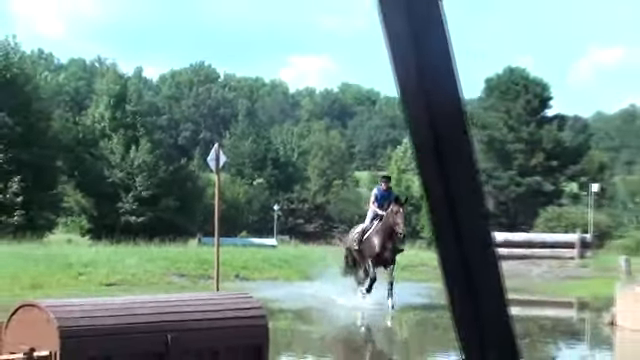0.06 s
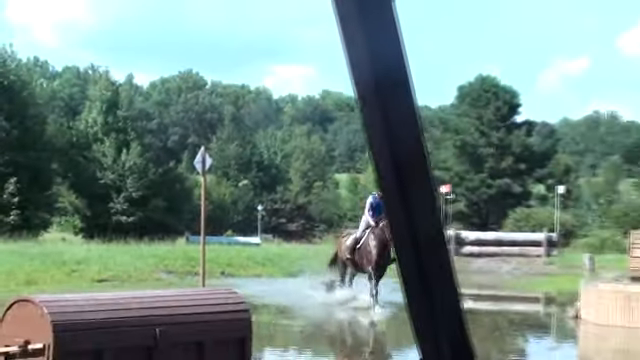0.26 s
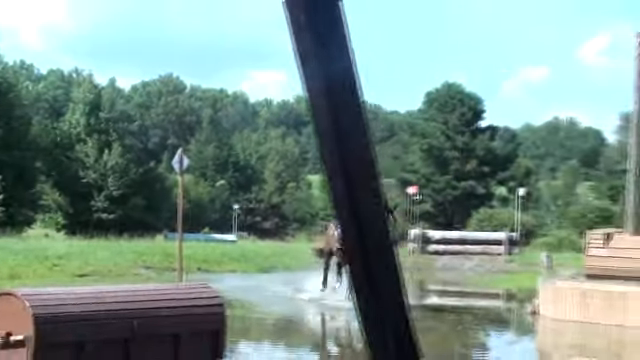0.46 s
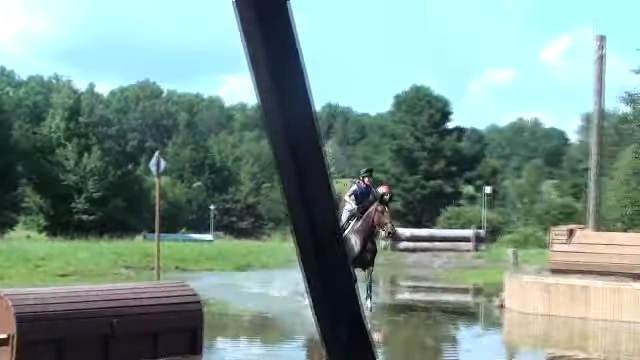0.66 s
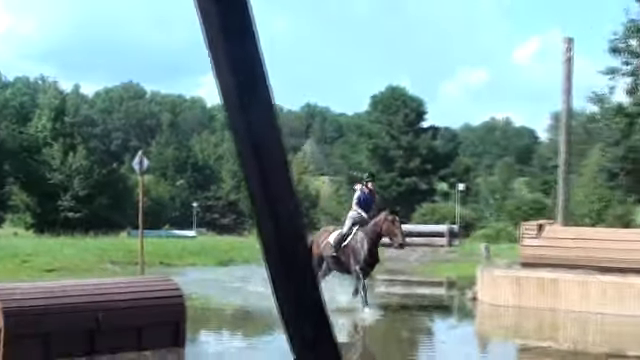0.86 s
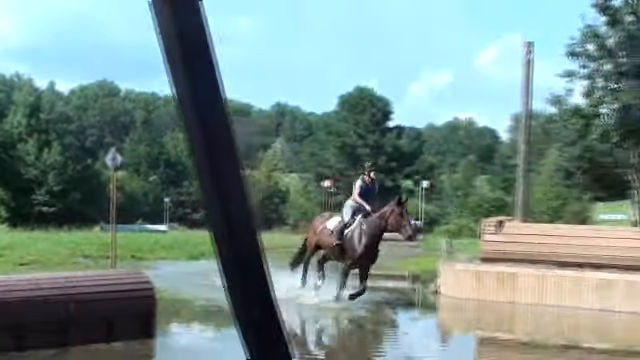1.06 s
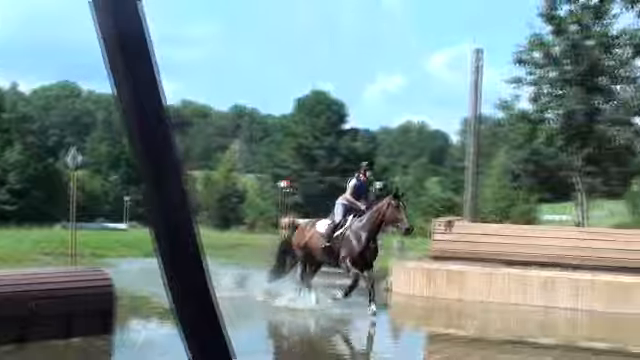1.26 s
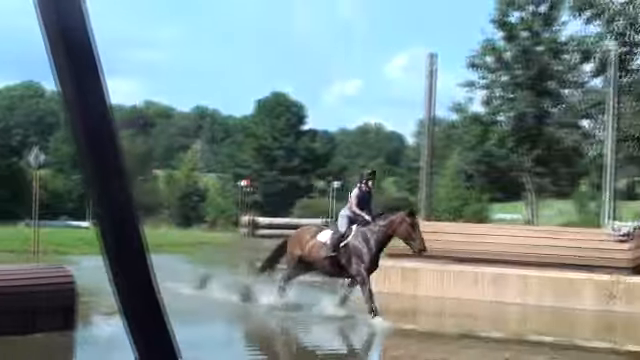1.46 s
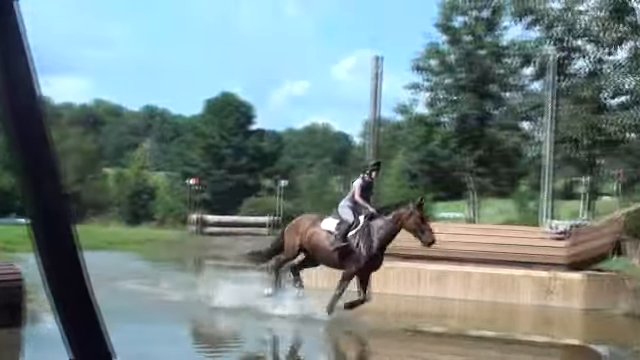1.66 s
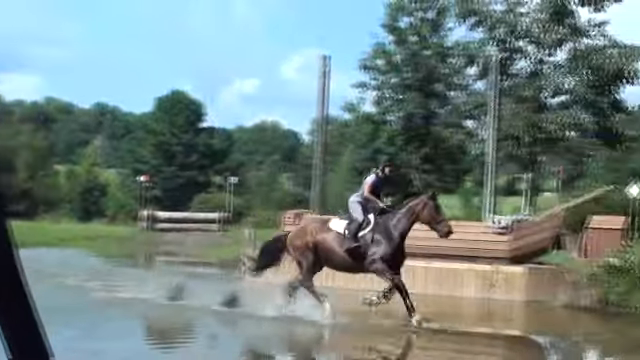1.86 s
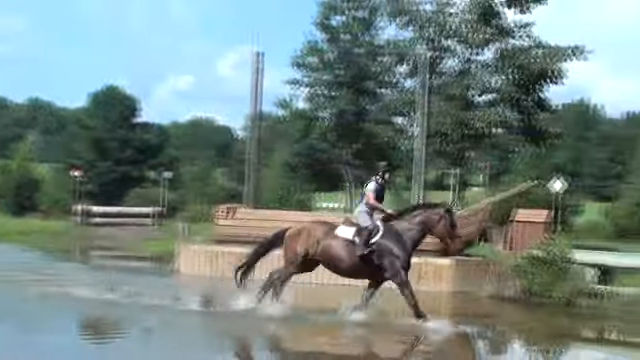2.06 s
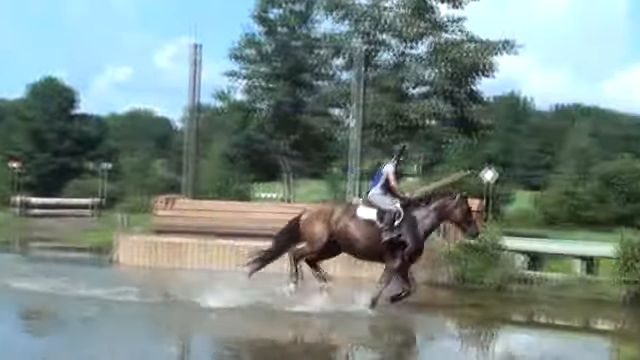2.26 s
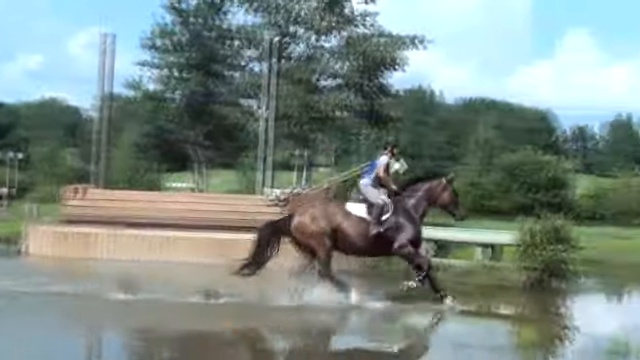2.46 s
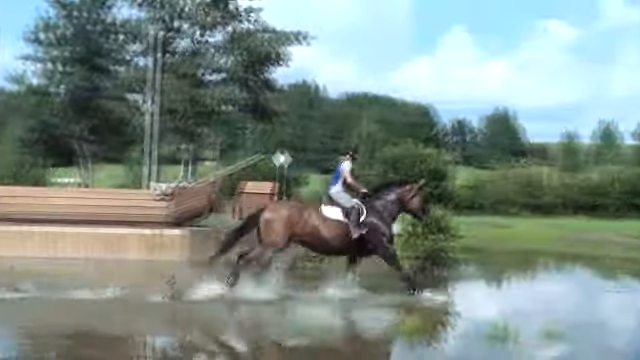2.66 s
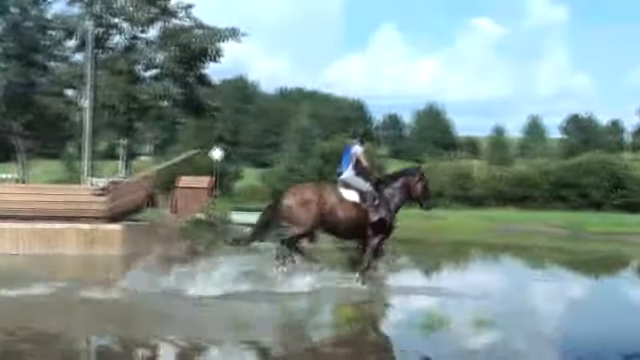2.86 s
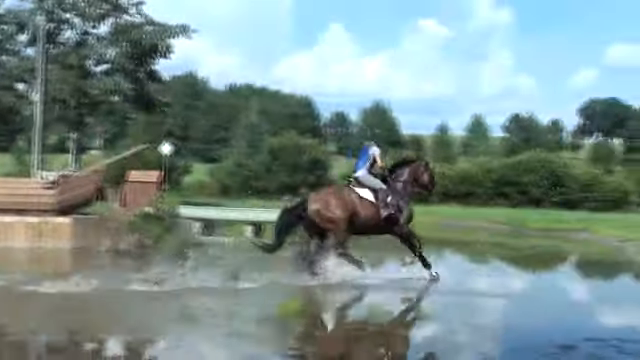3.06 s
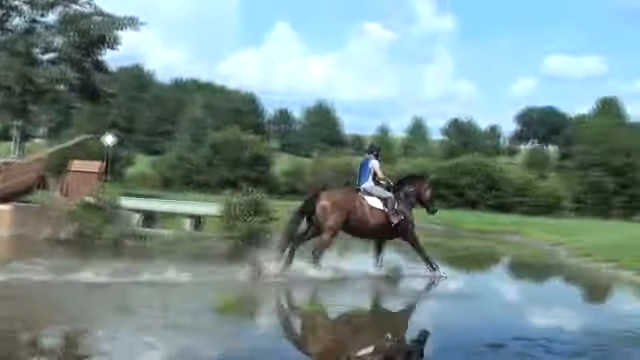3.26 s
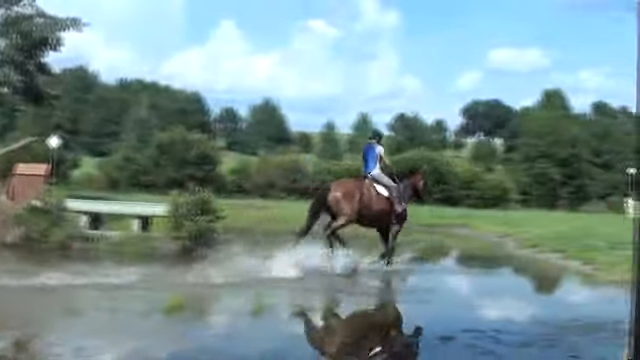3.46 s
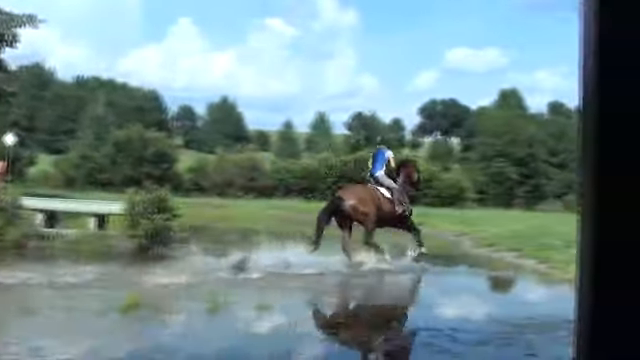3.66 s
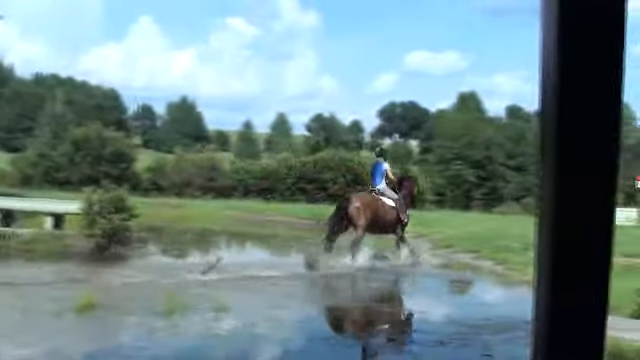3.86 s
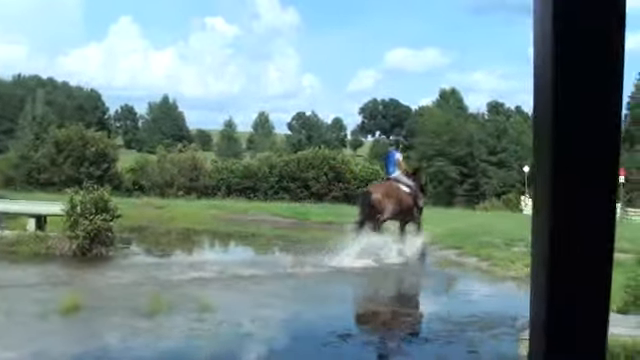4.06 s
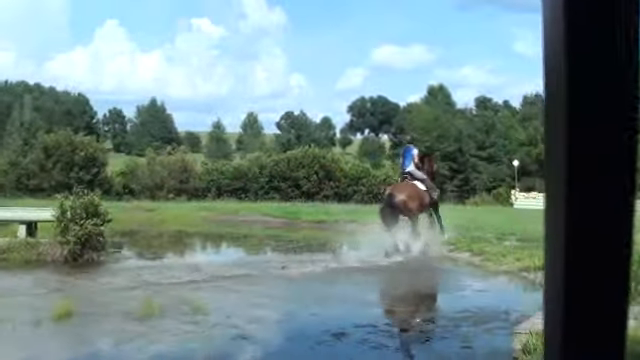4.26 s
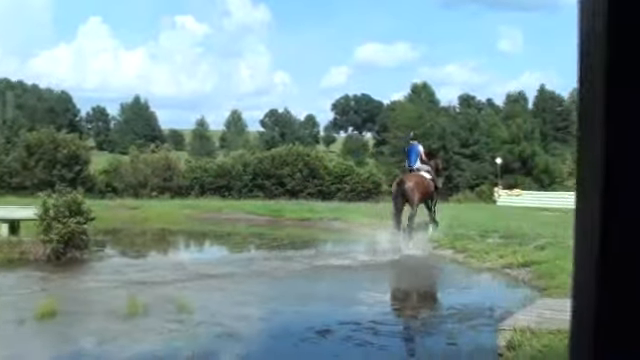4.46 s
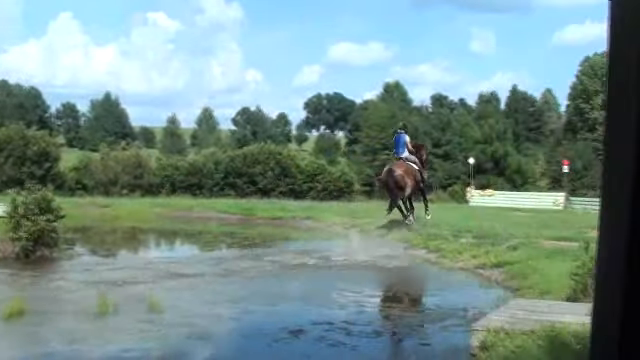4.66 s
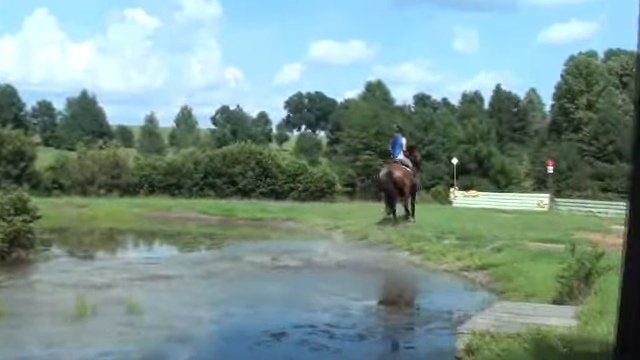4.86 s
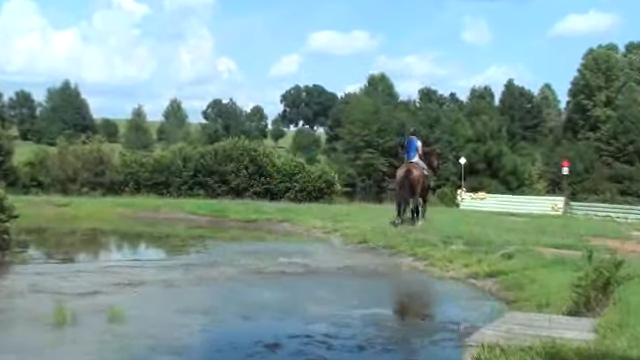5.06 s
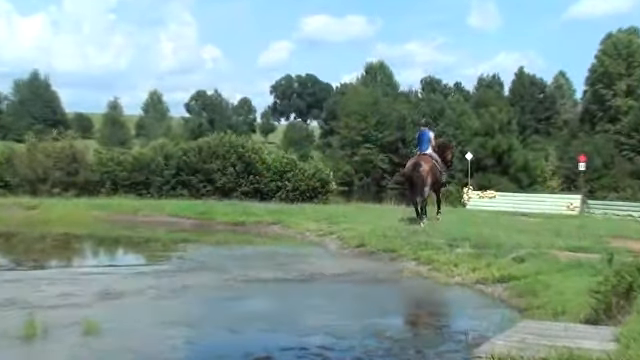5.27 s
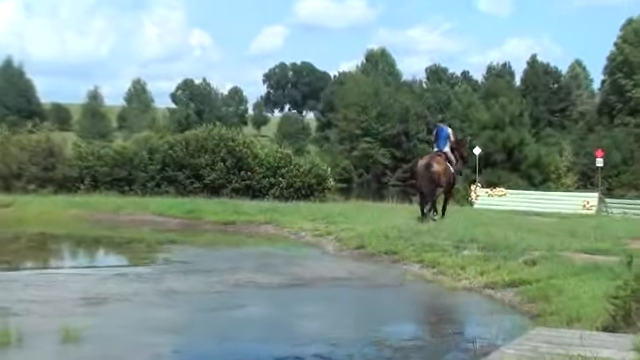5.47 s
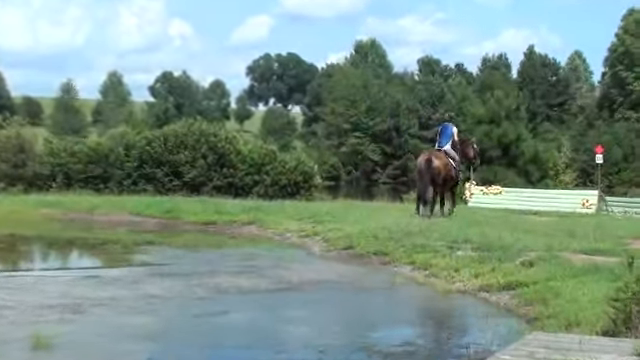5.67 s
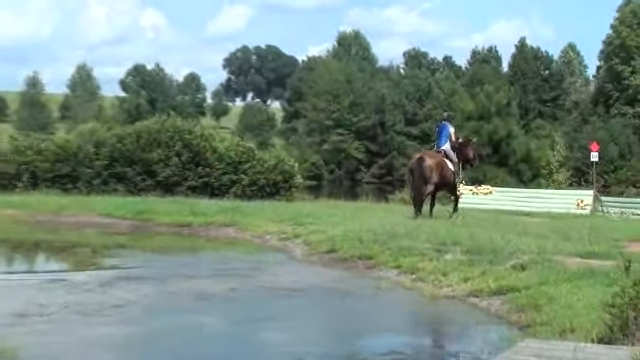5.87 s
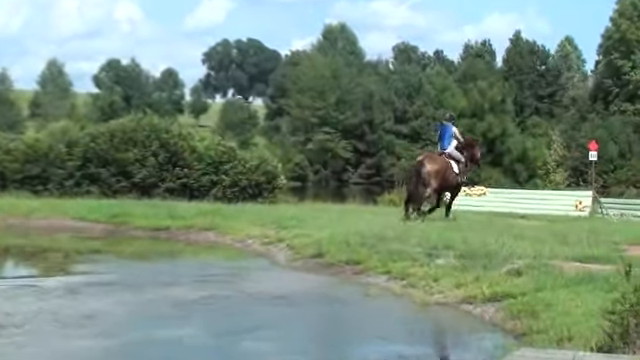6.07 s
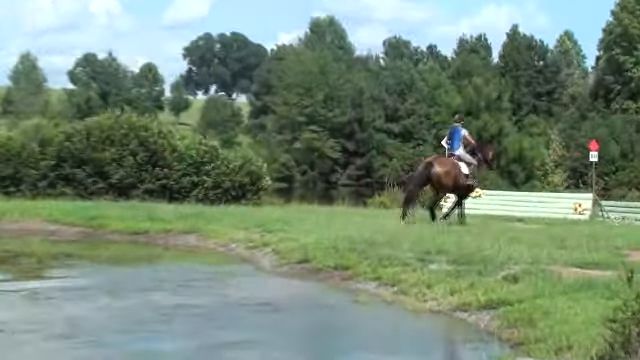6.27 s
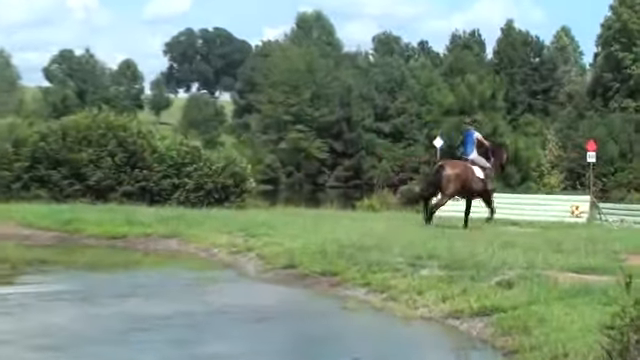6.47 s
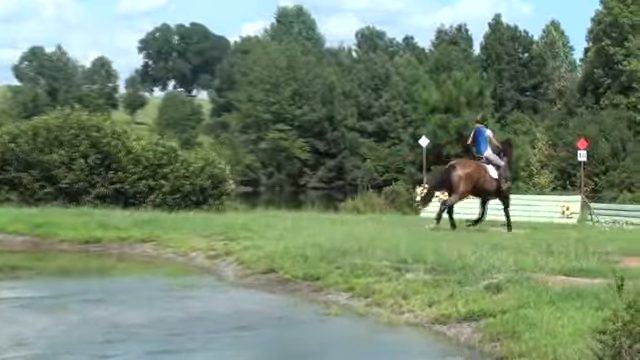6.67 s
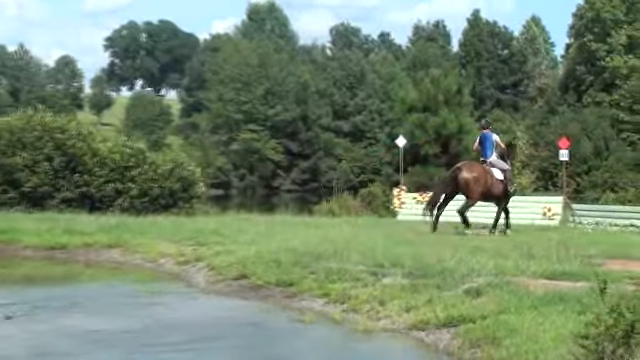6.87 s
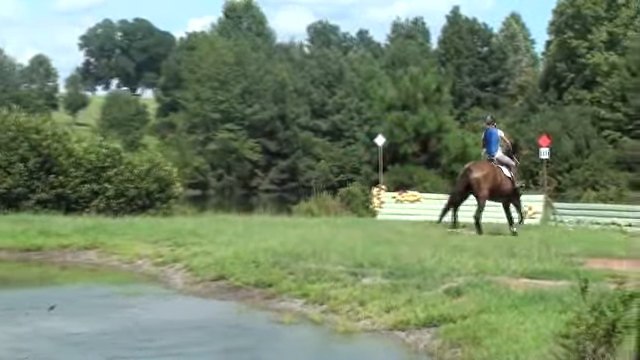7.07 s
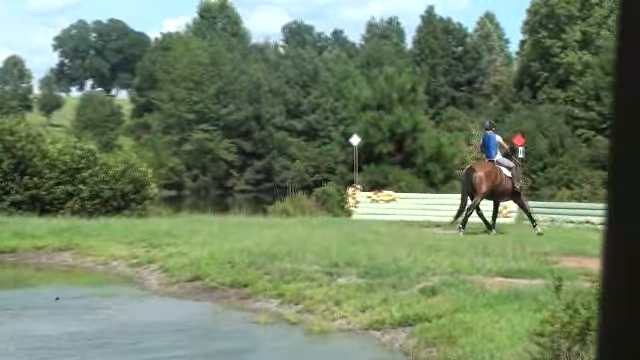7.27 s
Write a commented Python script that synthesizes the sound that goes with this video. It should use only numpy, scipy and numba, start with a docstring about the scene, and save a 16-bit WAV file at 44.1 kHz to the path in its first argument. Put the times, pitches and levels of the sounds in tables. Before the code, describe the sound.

Rhythmic churning splashes swell as a cantering horse passes through shallow water, then fade to faint turf thuds, insects and a distant trilling bird.

```python
"""A shallow pond in a summer field, heard from under an open shelter: a horse canters through, passes close by,
climbs out and carries on over turf. Showers of rising damped sines make the churning, babble and spray;
shaped noise bursts make the slaps, and noise with bending rings the gulps, late drips and dull hoofbeats.
Short rings with hiss crack on top. Insects are narrow noise throbbing with wing strokes; a far bird is gliding sines."""
import sys
import numpy as np
from scipy import signal
from scipy.fft import rfft, irfft, next_fast_len
from scipy.io import wavfile
from scipy.ndimage import uniform_filter1d
from numba import njit

SR = 44100
rng = np.random.default_rng(int(sys.argv[2]) if len(sys.argv) > 2 else 0)


def store_pcm(level_fs):
    """Save levels as 16-bit WAV."""
    pcm = np.round(np.clip(level_fs, -1, 1) * 32767).astype(np.int16)
    wavfile.write(sys.argv[1], SR, np.atleast_2d(pcm).T)


N = 323208
TIME = np.arange(N) / SR
TOP_HZ = 15400  # upper edge of the sound
LEAVES_WATER_S = 4.13  # the horse reaches the bank

# colour of thrown water hitting the surface: (frequency [Hz], relative gain [dB])
SLAP_SPRAY = [(1800, -77), (3000, -3.5), (4200, 2.5), (5500, -1), (7500, 6.5), (10000, 1), (13000, -8.5),
              (15500, -18)]
# colour of the insect chorus: (frequency [Hz], relative gain [dB])
INSECTS = [(5800, -28), (6800, -18), (7350, -11), (7630, -1), (7800, -3), (8130, 5.5), (8300, -1.5),
           (8600, -4), (9300, -38), (11000, -55)]


def undb(db):
    """Decibels to gain."""
    return 10 ** (np.asarray(db) / 20)


def unit(x):
    """Scale to rms 1."""
    return x / np.sqrt(np.mean(x ** 2) + 1e-20)


def shaped(x, gain):
    """Filter by a gain that is a function of frequency."""
    size = next_fast_len(len(x))
    hz = np.maximum(np.fft.rfftfreq(size, 1 / SR), 1)
    return irfft(rfft(x, size) * gain(hz), size)[:len(x)]


def colour(x, points):
    """Filter x through (Hz, dB) points, falling off above the last one, and scale to rms 1."""
    at, db = np.transpose(points)

    def gain(hz):
        rolloff = np.maximum(hz / at[-1], 1) ** 2
        return undb(np.interp(np.log(hz), np.log(at), db)) / rolloff

    return unit(shaped(x, gain))


def walk(rate_hz):
    """Smooth random wandering with an rms of 1, heading for a new value rate_hz times a second."""
    hold = max(int(SR / rate_hz), 2)
    steps = np.repeat(rng.standard_normal(N // hold + 1), hold)
    return unit(uniform_filter1d(steps, hold)[:N])


def add(out, sound, centre_s):
    """Mix a sound in, centred on a time."""
    at = int(centre_s * SR) - len(sound) // 2 + np.arange(len(sound))
    inside = (at >= 0) & (at < N)
    out[at[inside]] += sound[inside]


@njit
def ring(start, hz, cycles, size, rise):
    """Sum of bubbles: damped sines whose pitch climbs as they near the surface."""
    out = np.zeros(N)
    for k in range(len(start)):
        life = int(cycles[k] * SR / hz[k]) + 2
        step = 2 * np.pi * hz[k] / SR
        z = size[k] + 0j  # a rotating, shrinking phasor
        turn = np.exp(1j * step - 5 / life)
        glide = np.exp(1j * step * rise / life)
        for i in range(start[k], min(start[k] + life, N)):
            z *= turn
            turn *= glide
            out[i] += z.imag
    return out


def bubbles(lo_hz, hi_hz, cycles, scatter_db, rise, count):
    """A shower of bubbles of mixed sizes; a positive scatter makes a few stand out, a negative one makes a few faint."""
    when, pitch, damping, luck = rng.random((count, 4)).T
    hz = lo_hz + (min(hi_hz, TOP_HZ) - lo_hz) * pitch
    rarity = -np.log(np.maximum(luck, np.exp(-5)))
    size = undb(scatter_db * rarity) * np.sqrt(hz)
    return unit(ring((when * N).astype(np.int64), hz, cycles * (.5 + damping), size, float(rise)))


def burst(grain, length_s, db, tail_db, tail_s, attack=0.45):
    """A quick rise (attack: its share of the length), a short hold, then a collapse into a weak tail."""
    t = (np.arange(len(grain)) - len(grain) // 2) / SR
    length_s = max(length_s, 1 / 500)
    onset = np.clip((t / length_s + .6) / max(attack, .05) + .5, 0, 1)
    collapse = np.exp(-2 * (np.maximum(t, 0) / length_s) ** 2)
    tail = undb(tail_db) * np.exp(-np.abs(t) / tail_s)
    sound = grain * onset * np.maximum(collapse, tail)
    # total energy equals that of the given level held for length_s
    return sound * undb(db) * np.sqrt(length_s * SR / np.sum(sound ** 2))


def crackle(scatter_db, size=8192):
    """Dense tiny impacts as noise; scatter_db makes their strength uneven."""
    click, strength = rng.standard_normal((2, size))
    return click * undb(scatter_db * unit(uniform_filter1d(strength, size=12)))


def thump(hz, octaves, tone, bend, size=8192):
    """A broad resonance stirred by turbulence, plus a ring whose pitch bends; the broader, the weaker the ring."""
    def resonance(f):
        return np.exp(-(np.log2(f / hz) / max(octaves, .2) / 2) ** 2) / np.sqrt(f)

    stir = shaped(rng.standard_normal(size), resonance)
    t = (np.arange(size) - size // 2) / SR
    bent_hz = hz * (1 + bend * np.tanh(t / 0.0204))
    clean = np.sin(2 * np.pi * (np.cumsum(bent_hz) / SR + rng.random()))
    return unit(stir) + tone * np.exp(-(octaves / .5) ** 2) * clean


def wash_levels():
    """Relative churning, bubbling and spray in dB: swelling as the horse passes, surging twice in each stride."""
    # wash as the horse nears, passes and leaves the pond: (time [s], churning [relative dB],
    # bubbling [relative dB], spray [relative dB], depth of the surging [factor])
    passage = [(0, -36.5, -35.5, -37.5, 1), (0.44, -36, -35, -38, 1), (0.6, -37, -34.5, -34, 1.2),
               (1.1, -30.5, -29.5, -32.5, 1.4), (1.4, -31, -29.5, -29, 1), (1.8, -30, -26.5, -28.5, .8),
               (2.7, -28.5, -27, -27, .6), (3.4, -28.5, -26.5, -28, .6), (3.8, -30, -28.5, -28.5, .6),
               (4.45, -30, -27, -31, .8), (4.95, -44.5, -36, -40, 0), (5.2, -51, -44, -45.5, 0),
               (5.28, -45, -45.5, -49, 0), (5.5, -58.5, -54.5, -50.5, 0), (6, -51, -58, -58, 0)]
    # each stride of the canter begins as a foreleg lands: (time [s])
    strides_s = [-0.24, 0.345, 0.94, 1.525, 2.11, 2.69, 3.31, 3.93, 4.52, 5.11]
    # two surges of a stride, foreleg then hind pair: (position [share of the stride],
    # churning change [dB], bubbling change [dB], spray change [dB], all before the depth factor)
    stride_swell = [(0, -2.5, -1, -1.5), (0.08, 2, 1.5, 1.5), (0.21, -4, -3.5, -4.5), (0.34, -2, -1, -0.5),
                    (0.5, -0.5, 0, 0.3), (0.68, 1.5, 1, 1), (0.85, 2, 2, 2), (0.95, -4, -3.5, -3.5)]
    settle_s = 0.25  # the surging dies away on the bank
    s, *levels, depth = np.transpose(passage)
    share, *swells = np.transpose(stride_swell)
    phase = np.interp(TIME, strides_s, np.arange(len(strides_s)))
    wading = np.interp(TIME, s, depth) * np.clip(1 - (TIME - LEAVES_WATER_S) / settle_s, 0, 1)
    return [np.interp(TIME, s, db) + wading * np.interp(phase, share, swell, period=1)
            for db, swell in zip(levels, swells)]


def wake():
    """Big bubbles churn and plop round the legs, smaller ones babble and plink, and spray patters back on the pond."""
    # colours of the water, each (frequency [Hz], relative gain [dB])
    churn_colour = [(25, -50), (50, -38), (75, -12.5), (120, -5.5), (200, -3.5), (400, -0.5), (800, 6.5),
                    (1080, -6.5), (1500, -10.5)]
    bubbling_colour = [(700, -7), (1050, -3.5), (1600, -2.5), (2200, -4), (2900, -5.5), (3600, -10),
                       (5000, -15)]
    bank_colour = [(800, -24), (1200, -3.5), (1600, -1), (1950, 0), (2300, 0.5), (2650, -4.5),
                   (3000, -12), (4500, 1)]  # bubbling by the bank
    spray_colour = [(2200, -8), (3300, -3), (4200, -0.5), (5200, -1), (6300, -1), (7500, 3), (9000, 0.5),
                    (11000, -5), (13000, -8.5), (15500, -13)]
    # lone bubbles that ring on and blobs that do not, against the churning and the froth
    plop_db, plink_db, splat_db = -8.5, -6, -8
    churn_db, bubbling_db, spray_db = wash_levels()

    churn = colour(bubbles(80.0, 1357, cycles=10.1, scatter_db=2.0, rise=0.2, count=9000), churn_colour)
    plops = bubbles(380, 1000, cycles=26, scatter_db=1.0, rise=0.08, count=400)
    churn = churn + undb(plop_db) * colour(plops, churn_colour)

    froth = bubbles(825, 3730, cycles=25.5, scatter_db=0.5, rise=0.16, count=30000)
    plinks = bubbles(950, 3200, cycles=52, scatter_db=1.5, rise=0.08, count=1800)
    splats = bubbles(700, 3500, cycles=5, scatter_db=1.3, rise=0.08, count=1100)  # blobs that land flat
    small = froth + undb(plink_db) * plinks + undb(splat_db) * splats
    nearing_bank = np.clip((TIME - 3.3) / 0.61, 0, 1)  # the bubbling brightens as the horse nears the bank
    babble = (1 - nearing_bank) * colour(small, bubbling_colour) + nearing_bank * colour(small, bank_colour)

    spray = colour(bubbles(2880, 13600, cycles=4.4, scatter_db=-0.5, rise=0.078, count=56000), spray_colour)
    # big drops hit hard and stand out as the spray thins
    ticks = colour(bubbles(1400, 12800, cycles=6.8, scatter_db=3.2, rise=.05, count=1100), SLAP_SPRAY)
    ticks_db = np.interp(TIME, [4.4, 5.2], [-13, -4])
    spray = spray + undb(ticks_db) * ticks

    clumps = walk(60)  # the water comes down in sheets and blobs
    settling = np.clip((6.1 - TIME) / 0.42, 0, 1)
    return settling * (churn * undb(churn_db - 3.0 + 0.88 * clumps)
                       + babble * undb(bubbling_db - 2.0 + 0.5 * clumps)
                       + spray * undb(spray_db - 0.55 + .5 * clumps))


def wing_strokes():
    """The quick, slightly uneven beat of an insect's wings, from -1 to 1."""
    beat_hz = 61.6 * (1 + 0.051 * walk(25))
    return np.sin(2 * np.pi * np.cumsum(beat_hz) / SR)


def field():
    """Soft outdoor air under a chorus of insects, whose wing strokes make it flutter; single insects rasp above."""
    # colour of the open field: (frequency [Hz], relative gain [dB])
    air_colour = [(25, -40), (60, -3.5), (170, 4), (400, -4.5), (800, -7), (1600, -8.5), (3500, -12.5),
                  (7000, -10), (12000, -9.5), (15500, -14)]
    wing_depth = 0.16  # how far the strokes make the chorus throb
    air = colour(rng.standard_normal(N), air_colour) * undb(-49.5 + 1.0 * walk(5.6))
    chorus = colour(rng.standard_normal(N), INSECTS) * undb(-47.5 + 0.47 * walk(3.6) + 1.0 * walk(79))
    return air + chorus * (1 + wing_depth * wing_strokes()) + chirrs()


def surroundings():
    """Air and insects from all around, as noise that reaches the two sides in opposite polarity."""
    # colour of the air that differs between left and right: (frequency [Hz], relative gain [dB])
    diffuse = [(40, -25), (90, -16), (200, -1), (600, 2), (1200, -3.5), (2500, -13), (5000, -18),
               (15000, -36)]
    air = colour(rng.standard_normal(N), diffuse) * undb(-60.5)
    insects = colour(rng.standard_normal(N), INSECTS) * undb(-57.0)
    return air + insects


def gulp(length_s, hz, db):
    """One hollow closing: stirred water with a strong ring that rises in pitch."""
    return burst(thump(hz, octaves=.33, tone=2.6, bend=0.0792), length_s, db, tail_db=-16.0, tail_s=0.041)


def plunges():
    """The hollow behind each leg closes with a gulp that rises in pitch; small ones follow the churning."""
    # big cavities closing behind the legs: (centre [s], length [s], middle pitch [Hz], relative level [dB])
    cavities = [(0.015, 0.045, 164.7, -35), (0.059, 0.0068, 200, -29), (0.108, 0.017, 169, -33),
                (0.241, 0.0087, 331, -25.5), (0.351, .007, 300, -25), (0.368, 0.0081, 560, -24),
                (0.56, 0.018, 346, -31.5), (0.637, 0.024, 796, -30), (0.655, 0.021, 158, -34.5),
                (0.756, 0.017, 796, -30), (0.777, 0.011, 346.5, -30), (0.854, .014, 1115, -23.5),
                (0.883, 0.02, 667, -27.5), (0.952, 0.0045, 698, -16), (0.966, 0.0044, 381, -19),
                (0.969, 0.0073, 250, -21), (1.253, 0.006, 783, -22), (1.335, 0.029, 374, -28),
                (1.362, 0.0056, 272, -21), (1.445, 0.016, 176, -34.5), (1.49, 0.017, 700, -25),
                (1.545, 0.0045, 622, -15), (1.566, .006, 775, -24), (1.574, 0.0052, 440, -17),
                (1.583, 0.0026, 590, -17), (1.59, 0.006, 860, -16.5), (1.617, 0.012, 290, -29),
                (1.796, 0.019, 920, -27), (1.818, 0.01, 820, -20), (1.814, 0.0072, 294, -28),
                (1.919, 0.013, 369, -24), (1.965, 0.0075, 250.3, -22), (2.004, 0.0091, 287, -28),
                (2.13, 0.0044, 700, -25), (2.139, 0.0092, 395, -17), (2.178, 0.018, 328, -24),
                (2.296, 0.012, 877, -24), (2.317, 0.013, 861, -24.5), (2.414, 0.0091, 213.7, -17.5),
                (2.425, 0.0087, 987, -19), (2.454, 0.035, 276, -29), (2.537, 0.025, 904, -26),
                (2.56, .012, 285.3, -26), (2.588, 0.014, 622, -18), (2.643, 0.027, 783, -17.5),
                (2.643, 0.016, 347.6, -22), (2.716, 0.0087, 863, -18.5), (2.766, 0.019, 710, -20.5),
                (2.817, 0.025, 861, -26), (3.006, 0.012, 280.5, -22.5), (3.025, 0.03, 434, -25),
                (3.06, 0.023, 855, -25), (3.09, 0.021, 732, -26.5), (3.169, 0.024, 780, -24),
                (3.205, 0.0057, 690, -10), (3.212, 0.0054, 281.7, -18.5), (3.319, 0.0091, 390, -22),
                (3.366, 0.0078, 660, -17.5), (3.631, 0.017, 783, -22.5), (3.715, 0.022, 289, -26),
                (3.744, 0.015, 880, -23), (3.817, 0.0062, 796, -18.5), (3.852, 0.0098, 818, -24),
                (3.861, .014, 405, -28), (3.94, 0.0088, 818, -21), (3.937, 0.0097, 250, -29),
                (4.019, 0.015, 245.5, -27), (4.199, 0.05, 124, -31.5), (4.229, 0.042, 315.3, -27),
                (4.299, 0.0079, 247.4, -24), (4.329, 0.02, 622, -20.5), (4.337, 0.014, 273, -25),
                (4.526, 0.01, 622, -22.5), (4.529, 0.0053, 238.6, -14)]
    small_per_s, small_db = 11, -4  # rate; level over the churning
    lowest_hz, range_octaves = 167.4, 1.5
    out = np.zeros(N)
    for s, length_s, hz, db in cavities:
        add(out, gulp(length_s, hz, db), s)
    churn_db = wash_levels()[0]
    for k, (late, pitch) in enumerate(rng.random((int(small_per_s * LEAVES_WATER_S), 2))):
        s = (k + late) / small_per_s
        hz = lowest_hz * 2 ** (range_octaves * pitch)
        add(out, gulp(0.017, hz, np.interp(s, TIME, churn_db) + small_db), s)
    # muffled above 1400 Hz and thinned below 60 Hz
    return shaped(out, lambda hz: 1 / np.sqrt(1 + (hz / 1400) ** 6) / (1 + (60 / hz) ** 4)) * undb(-3.5)


def cracks():
    """A flat blow traps air that rings for a cycle or two, with a short hiss of torn water."""
    # smacks of a flat hoof (low) and snaps of heavy drops (high): (start [s], pitch [Hz], relative level [dB])
    smacks = [(0.0615, 1730, -13.5), (0.345, 775, -11.5), (0.3477, 1600, -11.5), (0.368, 5800, -11),
              (0.502, 5500, -8), (0.635, 1900, -16), (0.797, 6000, -17), (0.862, 7000, -14),
              (0.9445, 6500, -15), (0.9495, 1500, -14), (0.9637, 1900, -12), (1.0952, 3800, -10.5),
              (1.254, 3200, -16), (1.5257, 3500, -9), (1.542, 2740, -6.5), (1.563, 746, -14),
              (1.6738, 4000, -9), (1.891, 7500, -8), (2.0035, 5300, -6), (2.0238, 6500, -5),
              (2.1118, 4400, -1), (2.129, 8200, -2), (2.132, 2400, -12), (2.1578, 8000, -11),
              (2.259, 3000, -13), (2.486, 7000, -10), (2.6985, 5000, -17), (2.8443, 4300, -13),
              (2.8715, 8000, -22), (3.205, 1020, -12), (3.3167, 2460, -4.5), (3.7677, 2020, -13),
              (3.934, 3960, -4), (3.9725, 4200, -10), (4.181, 7000, -9), (4.2915, 2200, -19),
              (4.3245, 1600, -13), (4.634, 2980, -20), (4.908, 10000, -19), (4.936, 9500, -27),
              (5.084, 3000, -25), (5.194, 6000, -22), (5.2437, 6000, -23), (5.398, 4000, -30),
              (5.442, 4100, -32), (5.561, 5200, -29), (5.6235, 3800, -34)]
    # colour of the hiss: (frequency [Hz], relative gain [dB])
    hiss_colour = [(40, -36), (200, -11), (600, -12), (1800, -8), (4000, -9), (8000, 6), (15000, -24)]
    decay_cycles, hiss_db, hiss_decay_s = 1.65, -10, 0.001
    out = np.zeros(N)
    t = np.maximum(np.arange(2048) - 1024, 0) / SR  # silent up to the centre, so the crack starts there
    for s, hz, db in smacks:
        air = np.sin(2 * np.pi * hz * t) * np.exp(-t * hz / decay_cycles)
        torn = colour(crackle(scatter_db=3.5, size=len(t)), hiss_colour)
        hiss = torn * (t > 0) * np.exp(-t / hiss_decay_s)
        add(out, undb(db) * (air + undb(hiss_db) * hiss), s)
    return signal.sosfilt(signal.butter(2, 200, "high", fs=SR, output="sos"), out) * undb(-1.2)


def slaps():
    """A hoof slaps the surface and tears it into a sheet of drops: one noise burst in a bright and a full colour."""
    # hooves and thrown water on the surface: (centre [s], length [s], relative spray [dB], relative body [dB])
    hits = [(0.066, 0.0037, -54, -25.5), (0.205, 0.0058, -30, -45), (0.243, 0.032, -51, -30),
            (0.353, 0.0053, -45, -19.5), (0.372, 0.014, -33, -22.5), (0.411, 0.015, -38, -31),
            (0.508, 0.0094, -20.5, -21), (0.573, 0.024, -30, -29), (0.64, 0.011, -48, -25.5),
            (0.686, 0.01, -27, -53), (0.715, .005, -25, -48), (0.762, 0.022, -45, -31),
            (0.797, 0.002, -18, -37), (0.857, 0.022, -28, -32), (0.947, 0.01, -22.5, -25),
            (0.964, 0.01, -22.5, -18.5), (1.01, 0.018, -36, -26.5), (1.096, 0.01, -18.5, -18),
            (1.114, 0.0058, -28, -29), (1.192, 0.015, -26.5, -41), (1.242, 0.041, -42, -25),
            (1.257, 0.0079, -18.5, -39), (1.289, 0.024, -26, -50), (1.348, 0.045, -49, -25.5),
            (1.467, 0.036, -44, -25.5), (1.533, 0.0076, -18.5, -24), (1.544, 0.0086, -22, -22.5),
            (1.566, 0.0093, -26, -31), (1.604, 0.04, -45, -29), (1.68, 0.012, -20.5, -18.5),
            (1.893, 0.011, -16.5, -45), (1.919, 0.03, -22, -44), (1.964, 0.0068, -21, -40),
            (2.03, 0.021, -23, -29), (2.116, 0.01, -15.5, -25), (2.133, 0.0099, -19, -24),
            (2.165, 0.014, -21.5, -40), (2.232, 0.0077, -47, -32), (2.267, 0.012, -16.5, -18),
            (2.38, 0.013, -31, -46), (2.416, 0.014, -24, -24), (2.471, 0.0048, -17.5, -42),
            (2.489, 0.01, -19, -43), (2.598, .025, -31, -31), (2.695, 0.01, -17, -20.5),
            (2.711, 0.0085, -21, -17), (2.775, 0.021, -29, -33), (2.846, 0.0084, -24, -23),
            (2.876, 0.0085, -17.5, -21.5), (3.012, 0.011, -23, -23.5), (3.066, 0.019, -20, -52),
            (3.185, 0.019, -40, -22.5), (3.21, 0.0066, -36, -28), (3.317, 0.015, -20, -18),
            (3.367, 0.012, -41, -24.5), (3.425, .02, -31, -30.5), (3.498, 0.014, -24.5, -28.5),
            (3.55, 0.03, -39, -27.5), (3.627, 0.017, -28, -26), (3.694, 0.014, -19, -33),
            (3.747, 0.018, -26, -31), (3.768, 0.0067, -28, -18), (3.791, .008, -21.5, -40),
            (3.845, 0.011, -28, -17.5), (3.936, 0.0075, -18.5, -18.5), (3.977, 0.0065, -18.5, -19),
            (4, 0.022, -41, -24.5), (4.084, 0.007, -23, -44), (4.174, 0.018, -31, -26),
            (4.295, 0.041, -26, -29.5), (4.334, 0.037, -31, -24), (4.418, 0.033, -27.5, -28.5),
            (4.53, 0.0084, -36, -24), (5.2, 0.0087, -36, -57)]
    # colour of the body of the slap: (frequency [Hz], relative gain [dB])
    body_colour = [(40, -41), (150, -5), (400, 0), (900, -3), (1700, 1.5), (2600, 1.5), (3300, -10.5),
                   (5000, -8.5)]
    out = np.zeros(N)
    for s, length_s, spray_db, body_db in hits:
        tear = crackle(scatter_db=0.0)
        spray = colour(tear, SLAP_SPRAY)
        body = colour(tear, body_colour)
        add(out, burst(spray, length_s, spray_db, tail_db=-33, tail_s=0.02, attack=0.59), s)
        add(out, burst(body, length_s, body_db, tail_db=-12.0, tail_s=0.031), s)
    return out * undb(-2.5)


def hoofbeats():
    """Dull, quickly damped blows on mud and grass, each with a faint swish of blades; the deep ones shake the ground."""
    # beats and knocks on bank and turf: (centre [s], length [s], relative level [dB],
    # middle pitch [Hz], spread [octaves])
    beats = [(4.682, .012, -34, 220, .4), (4.749, .007, -32, 650, .6), (5.025, .013, -35.5, 460, .4),
             (5.084, .007, -38, 600, .7), (5.105, .018, -37, 178, .5), (5.237, .012, -33, 230, .5),
             (5.262, .014, -43, 260, .6), (5.603, .012, -45, 480, .7), (5.877, .012, -48.5, 420, .7),
             (5.944, .02, -52, 250, .6), (6.132, .017, -47, 480, .6), (6.165, .012, -36, 470, .4),
             (6.192, .018, -42, 180, .5), (6.341, .02, -52, 520, .5), (6.521, .024, -43, 1450, .45),
             (6.56, .007, -38, 1350, .5), (6.575, .022, -47, 1350, .35), (6.631, .003, -28.5, 1550, .55),
             (6.954, .009, -39.5, 300, .5), (7.026, .013, -38.5, 500, .5), (7.064, .016, -41, 540, .5),
             (7.06, .028, -43, 178, .35)]
    # colour of the grass: (frequency [Hz], relative gain [dB])
    grass_colour = [(100, -12), (600, 0), (2200, -2), (4200, -7), (7000, -20), (15000, -36)]
    # light, high-pitched strokes brush more of the blades; swish level is for a 400 Hz blow
    grass_db, glancing_db_per_octave = -18.5, 5.5
    ground_hz, ground_db, ground_s = 93.5, -19, 0.027  # the soft ground gives under each hoof
    thuds, swish, ground = np.zeros((3, N))
    for s, length_s, db, hz, octaves in beats:
        blow = thump(hz, octaves, tone=0.99, bend=-.15)
        add(thuds, burst(blow, length_s, db, tail_db=-5.5, tail_s=2 * length_s, attack=0.67), s)
        blades = colour(crackle(scatter_db=-2), grass_colour)
        swish_db = db + grass_db + glancing_db_per_octave * np.log2(hz / 400)
        add(swish, burst(blades, length_s, swish_db, tail_db=-14, tail_s=length_s), s)
        shake = thump(ground_hz, octaves=0.25, tone=1, bend=-0.071) * undb(db + ground_db) * min(240 / hz, 1)
        t = (np.arange(len(shake)) - len(shake) / 2) / SR
        add(ground, shake * np.exp(-(t / ground_s) ** 2), s)
    # the thuds are muffled above 2300 Hz and thinned below 80 Hz
    dull = shaped(thuds, lambda hz: 1 / np.sqrt(1 + (hz / 2300) ** 12) / (1 + (80 / hz) ** 4))
    return swish + ground + dull * undb(-1.0)


def drips():
    """The last drops land one by one, each trapping a small bubble that rings upward."""
    # loudest late drops falling back on the pond: (centre [s], middle pitch [Hz], relative level [dB])
    drops = [(4.786, 1080, -35), (4.817, 2131, -36), (4.885, 2067, -33), (4.926, 1571, -42),
             (4.965, 645, -43), (5.045, 1560, -36), (5.085, 2680, -36.5), (5.166, 2260, -42),
             (5.195, 700, -40.5), (5.318, 1076, -41), (5.326, 1370, -40), (5.348, 1980, -41),
             (5.352, 1200, -46), (5.378, 1940, -44), (5.392, 1335, -47), (5.416, 2560, -46),
             (5.432, 1350, -45), (5.641, 1810, -42), (5.657, 1930, -44), (5.688, 1194, -44),
             (5.723, 1700, -48), (5.774, 1690, -48), (5.788, 1030, -48), (5.811, 1800, -50)]
    out = np.zeros(N)
    for s, hz, db in drops:
        bubble = thump(hz, octaves=.28, tone=1.6, bend=0.17)
        add(out, burst(bubble, .0055, db, tail_db=-8, tail_s=0.016), s)
    return out


def bird():
    """A distant quick trill of upward chips swells and ends on two level whistles, all gliding or wavering sines."""
    # closing whistles: (start [s], length [s], pitch [Hz], relative level [dB])
    whistles = [(6.545, .23, 5640, -62), (6.765, .26, 5385, -63.5)]
    # pitch at 5.9 s, its slow fall, the swing either side within each note
    trill_hz, sag_hz_per_s, glide_hz, trill_db = 6290, 90, 70, -53.5
    swelling = np.interp(TIME, [5.1, 5.65, 6.2, 6.54, 6.58], [0, .75, 1, 1, 0])
    beat = 2 * np.pi * 15 * (TIME - 5.855)  # 15 chips a second
    pitch = trill_hz - sag_hz_per_s * (TIME - 5.9) - glide_hz * np.cos(beat)
    chips = np.maximum(np.sin(beat), 0) ** 2
    song = undb(trill_db) * swelling * chips * np.sin(2 * np.pi * np.cumsum(pitch) / SR)
    for s, length_s, hz, db in whistles:
        swell = np.abs(np.sin(np.pi * np.clip((TIME - s) / length_s, 0, 1))) ** .3
        wavering_hz = hz + 22 * walk(300) + 6 * walk(20)
        song = song + undb(db + walk(40)) * swell * np.sin(2 * np.pi * np.cumsum(wavering_hz) / SR)
    return song


def chirrs():
    """Single insects rasp for about half a second in a narrow band of noise, one pulse to each wing stroke."""
    # rasps above the chorus: (start [s], length [s], pitch [Hz], width [Hz], relative level [dB])
    rasps = [(5.9, .48, 12100, 650, -59), (6.85, 0.6, 13800, 550, -62)]
    out = np.zeros(N)
    for s, length_s, hz, width_hz, db in rasps:
        rasp = unit(shaped(rng.standard_normal(N), lambda f: np.exp(-((f - hz) / width_hz) ** 2)))
        swell = np.sqrt(np.abs(np.sin(np.pi * np.clip((TIME - s) / length_s, 0, 1))))
        out += undb(db) * swell * rasp * (1 + .8 * wing_strokes())
    return out


def shelter(x):
    """Roof and posts lift some bands and hollow out others."""
    # peaks and dips: (centre [Hz], width [Hz], gain [dB])
    resonances = [(161, 11, -3.5), (176, 4.7, 2.5), (458, 23, 2), (509, 25, -2.5), (766, 27, -0.5),
                  (922, 32, 2.5), (1246, 115, -2), (1680, 136, 2), (4820, 210, -2.5)]
    return shaped(x, lambda hz: undb(sum(db * np.exp(-((hz - f) / w) ** 2) for f, w, db in resonances)))


def scene():
    """The horse in pond and field; the two sides hear it slightly out of step, the low mids louder on the left."""
    # quarter-turned sound that differs between left and right: (frequency [Hz], level against the middle [dB])
    out_of_step = [(40, -36), (120, -25), (300, -20), (700, -16), (1100, -20), (1500, -60), (2200, -60),
                   (3500, -51), (4500, -15.5), (5700, -34), (7500, -17.5), (10000, -70), (14000, -49)]
    far_lean = .06  # insects and bird sit a little to the right
    horse = wake() + cracks() + slaps() + plunges() + drips() + hoofbeats()
    far = field() + bird()
    both = shelter(horse + far)
    at, db = np.transpose(out_of_step)

    def side_gain(hz):
        louder_left = 0.098 * np.exp(-(np.log2(hz / 500) / 0.83) ** 2)
        return louder_left + 1j * undb(np.interp(np.log(hz), np.log(at), db))

    far_treble = shaped(far, lambda hz: np.exp(-(np.log2(hz / 7000) / .4) ** 2))
    side = shaped(both, side_gain) + surroundings() - far_lean * far_treble
    return both + np.array([side, -side])


def record(dry):
    """The camera rounds the hardest peaks and cuts the deepest rumble and the top."""
    rounded = dry / (1 + (dry / .7) ** 6) ** (1 / 6)
    trimmed = signal.sosfilt(signal.butter(2, 42, "high", fs=SR, output="sos"), rounded)
    return signal.sosfilt(signal.ellip(10, .2, 80, TOP_HZ, fs=SR, output="sos"), trimmed)


dry = scene()
out = record(dry)
store_pcm(out)
```